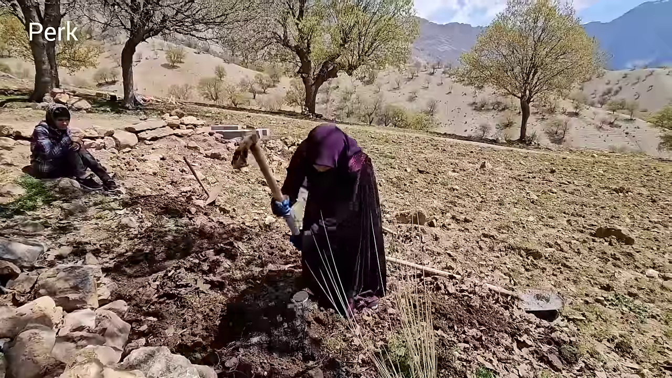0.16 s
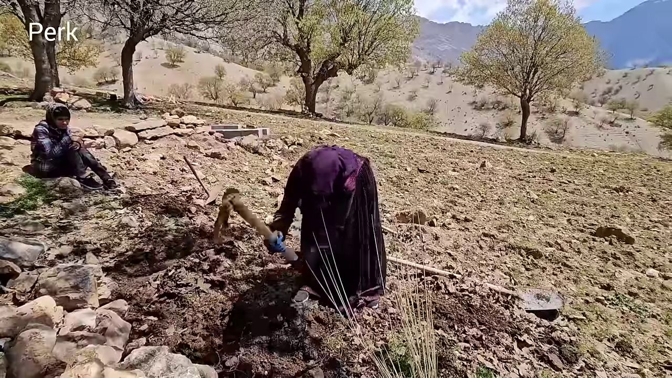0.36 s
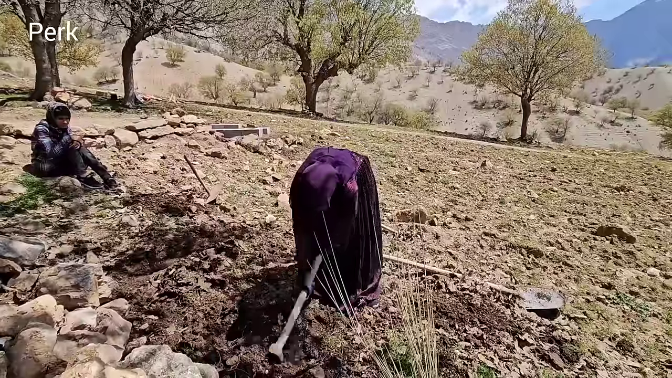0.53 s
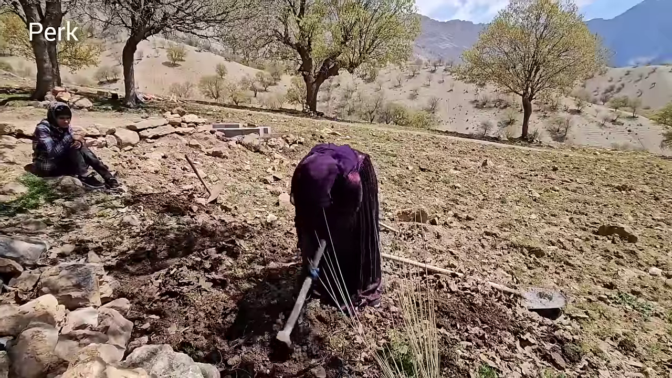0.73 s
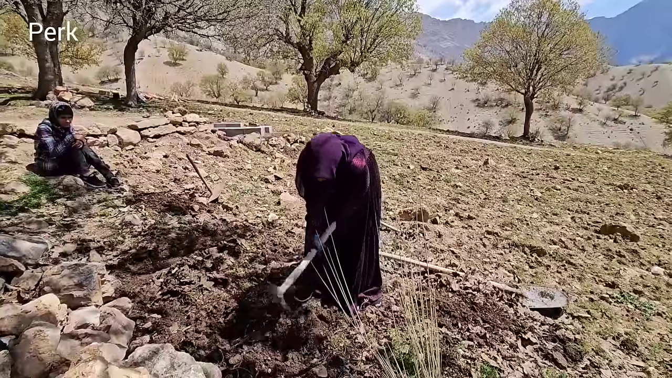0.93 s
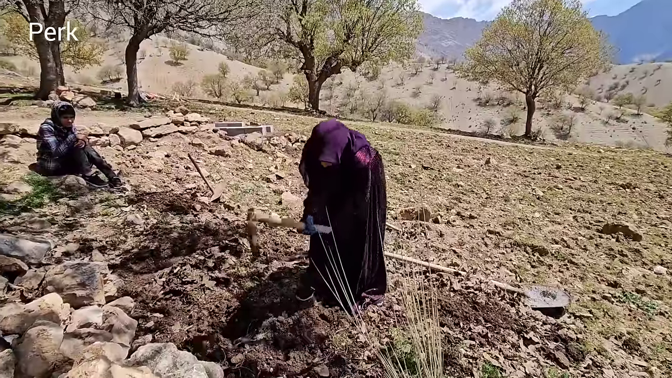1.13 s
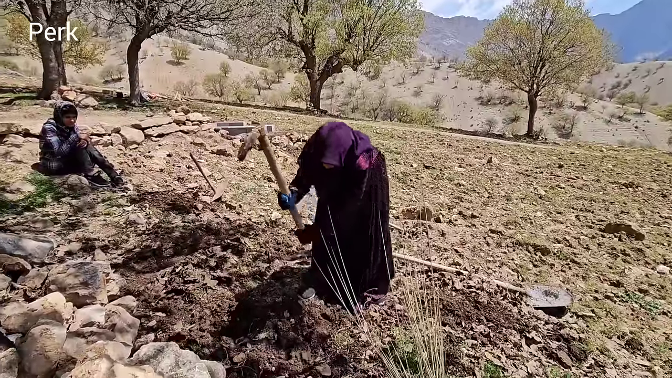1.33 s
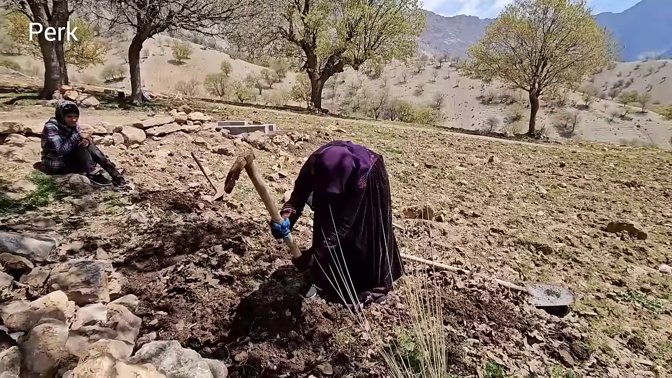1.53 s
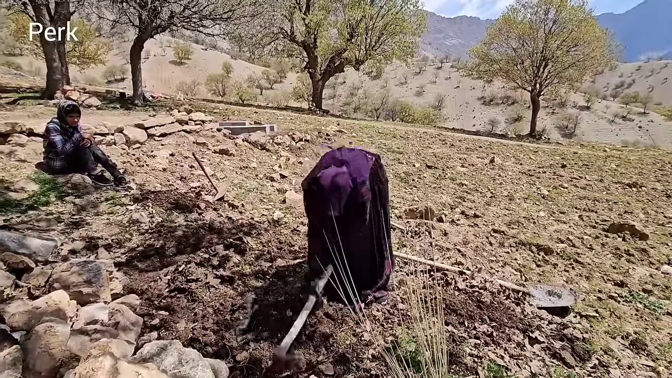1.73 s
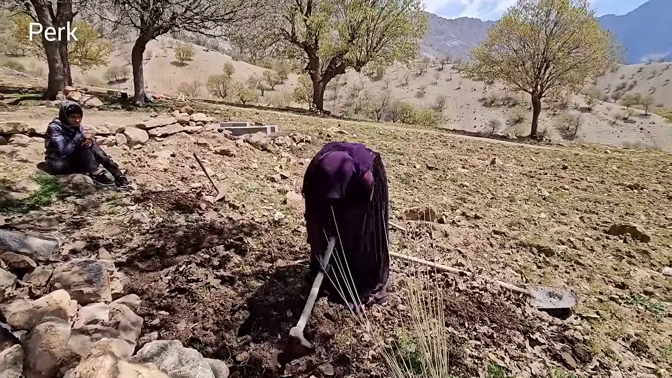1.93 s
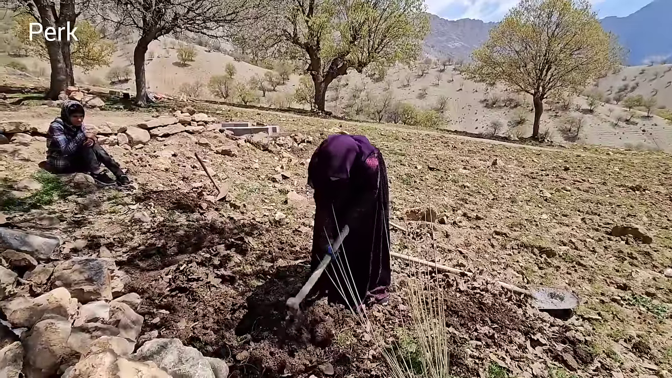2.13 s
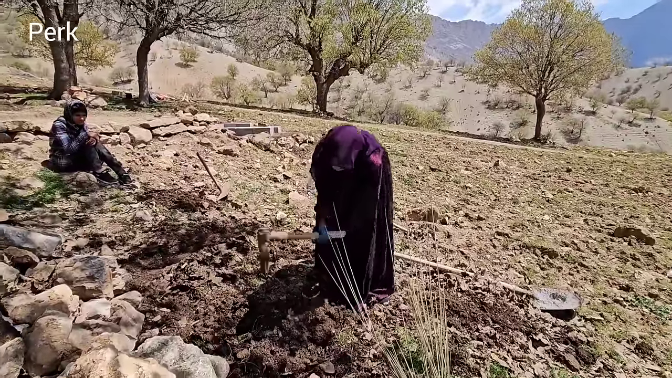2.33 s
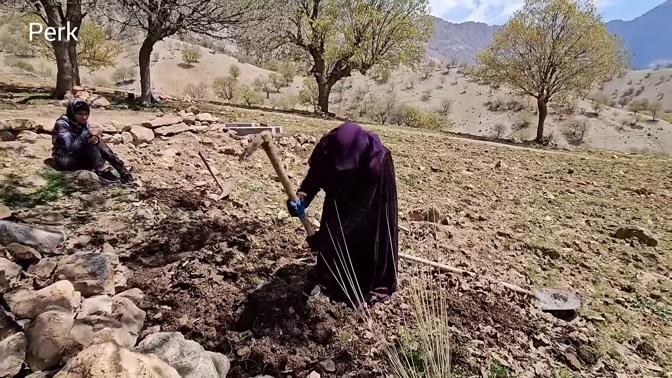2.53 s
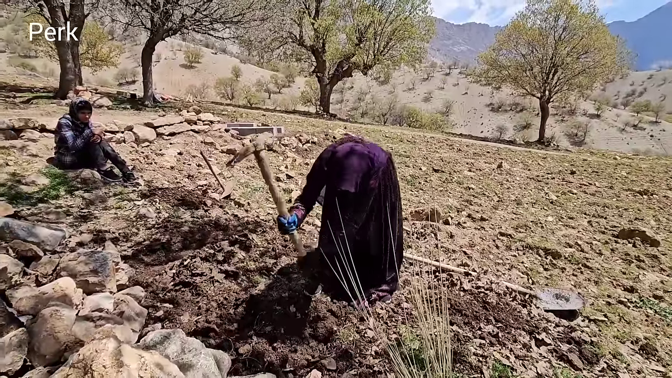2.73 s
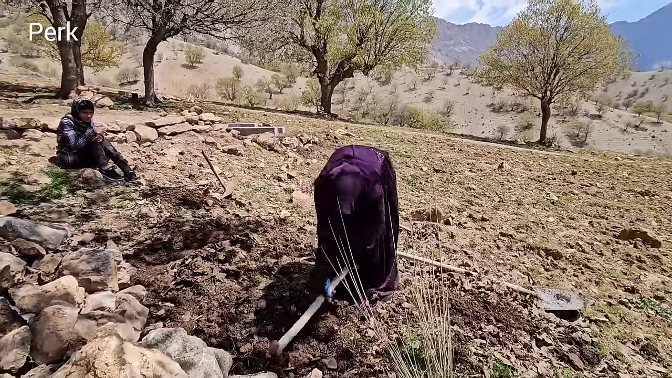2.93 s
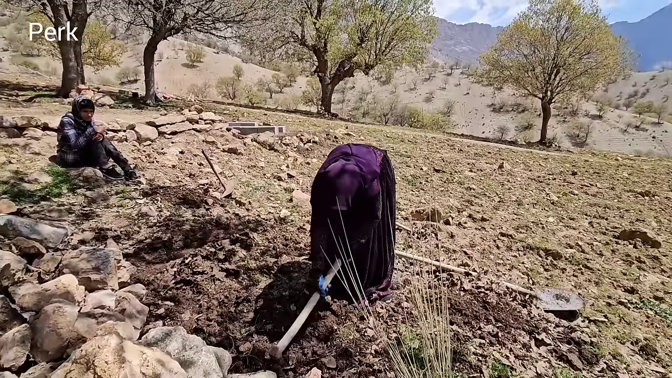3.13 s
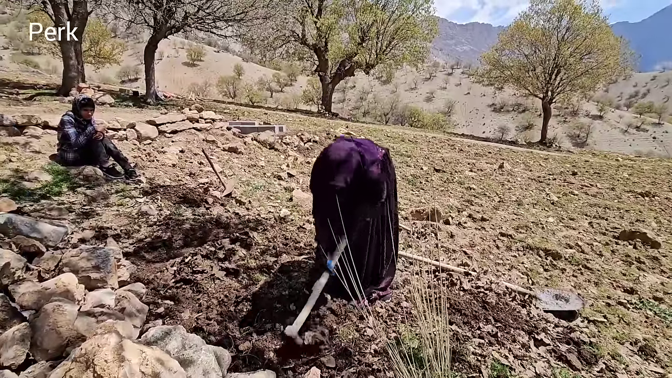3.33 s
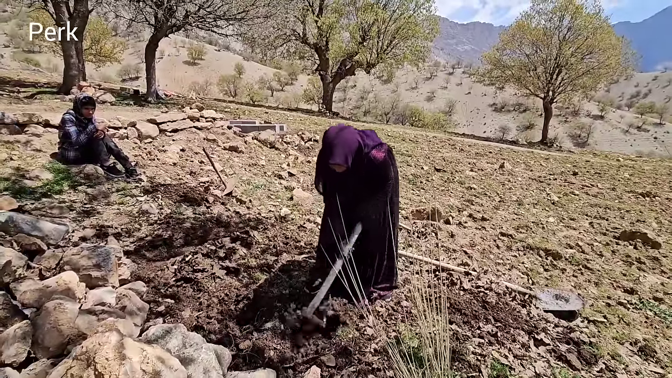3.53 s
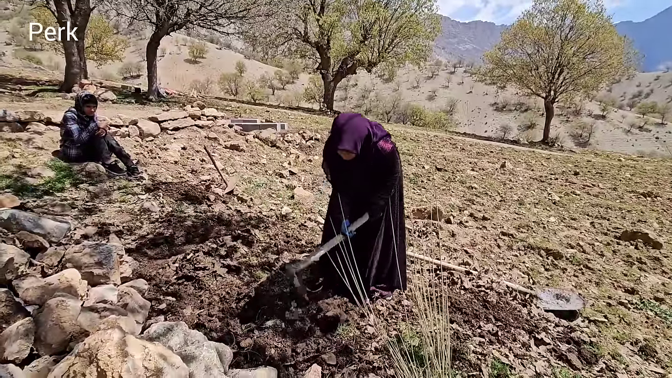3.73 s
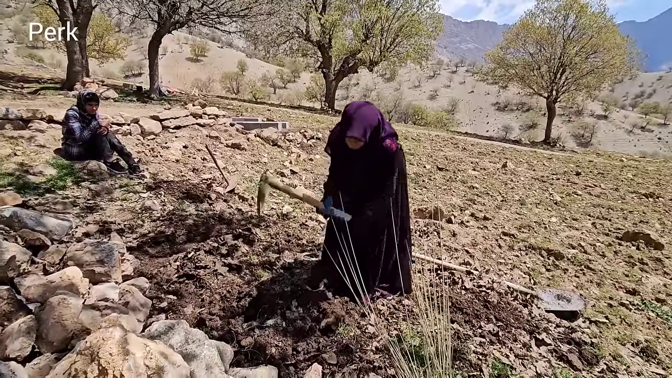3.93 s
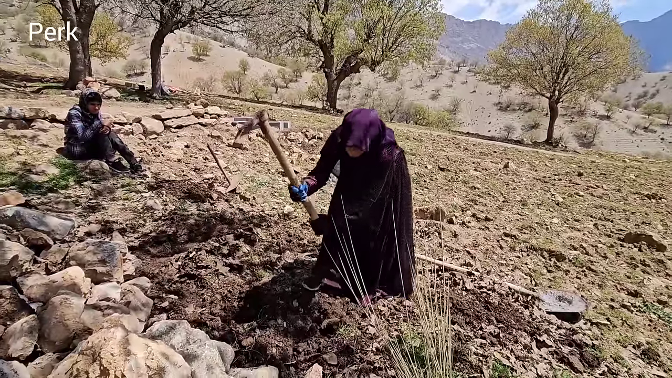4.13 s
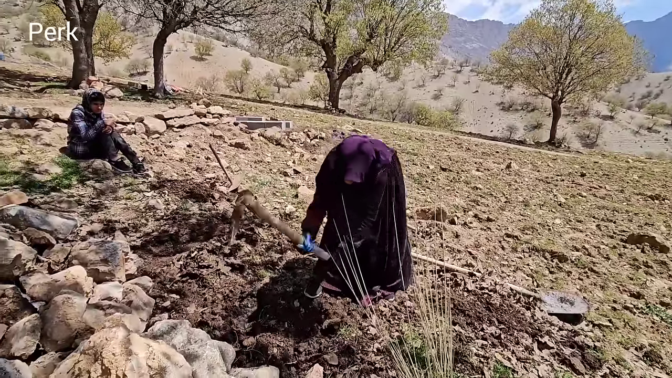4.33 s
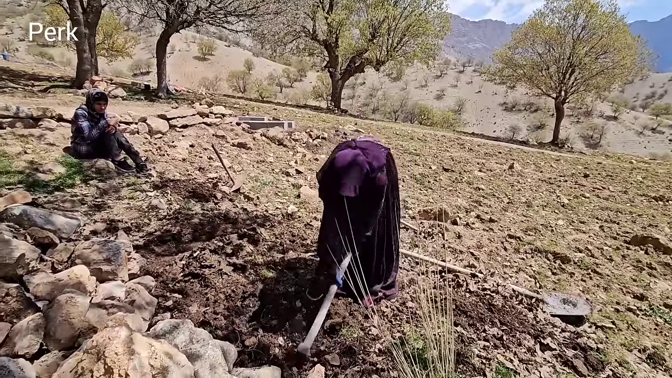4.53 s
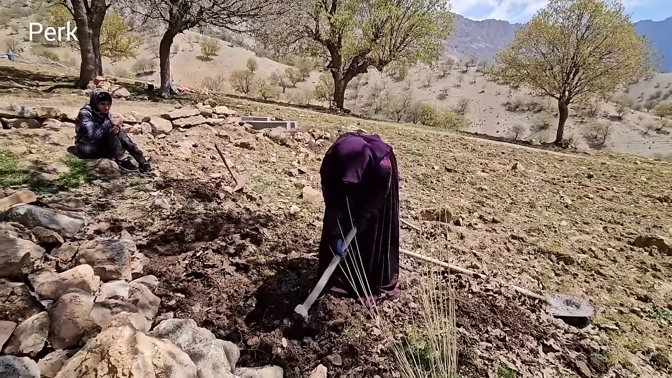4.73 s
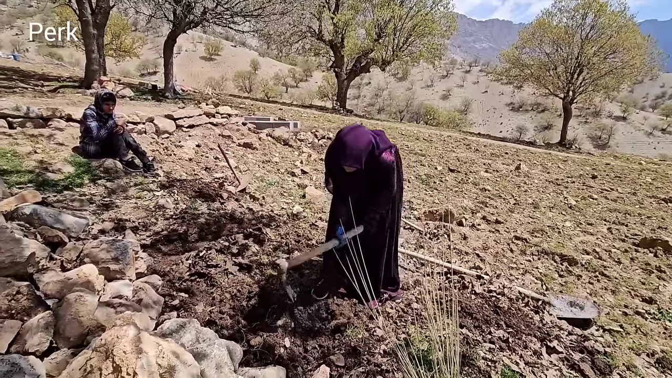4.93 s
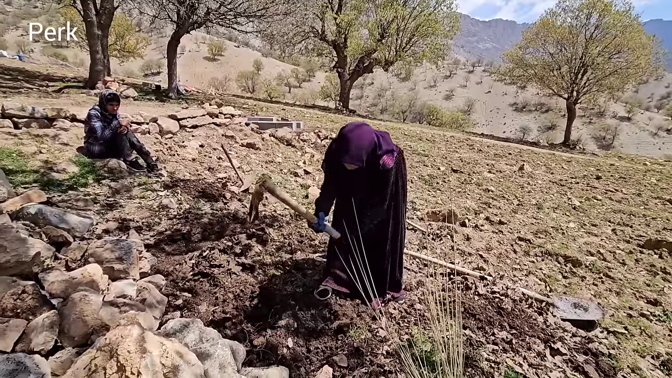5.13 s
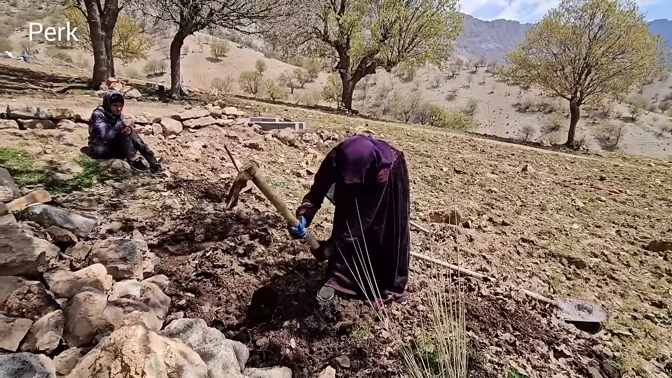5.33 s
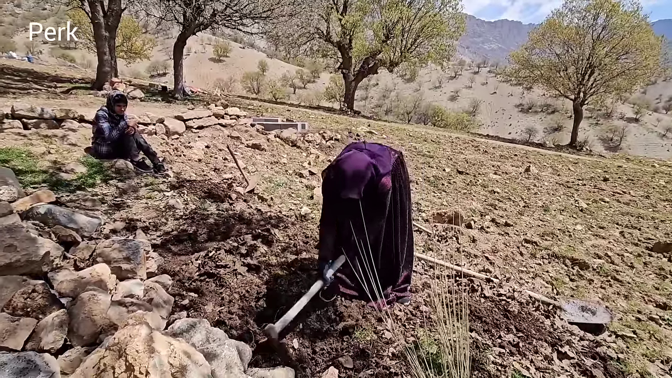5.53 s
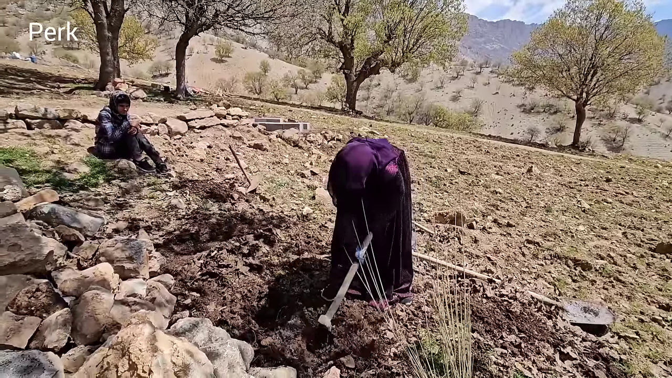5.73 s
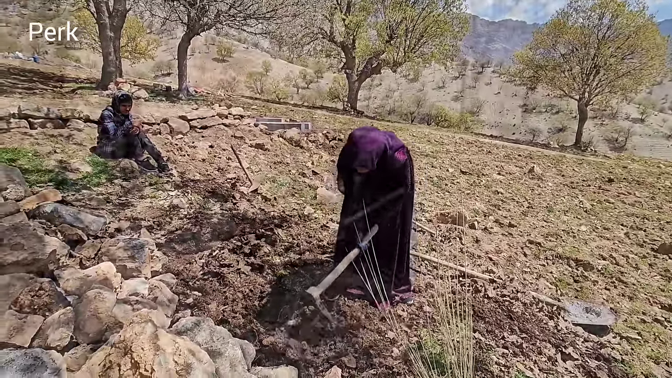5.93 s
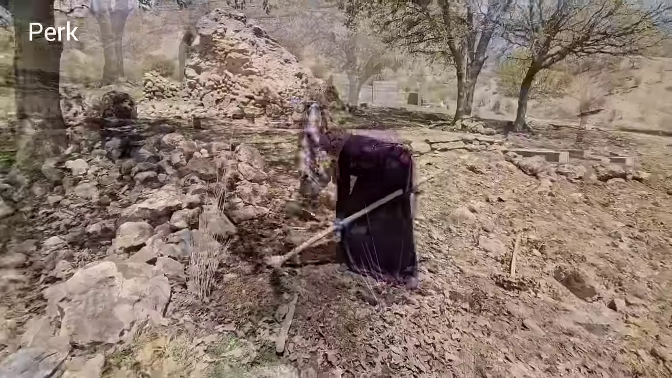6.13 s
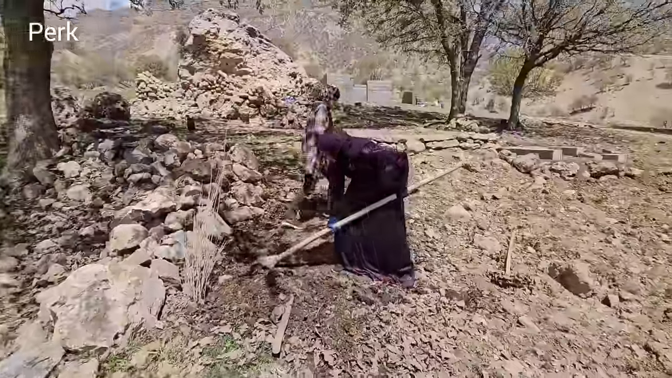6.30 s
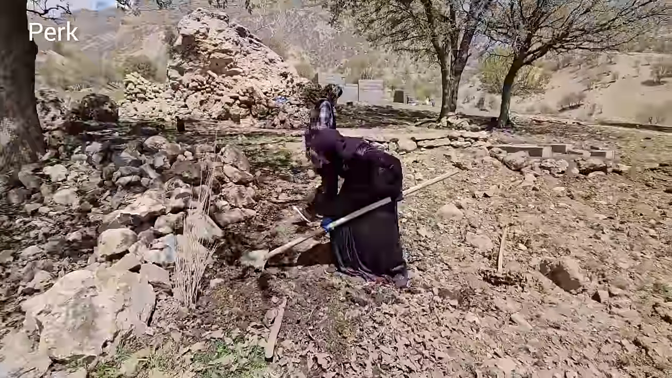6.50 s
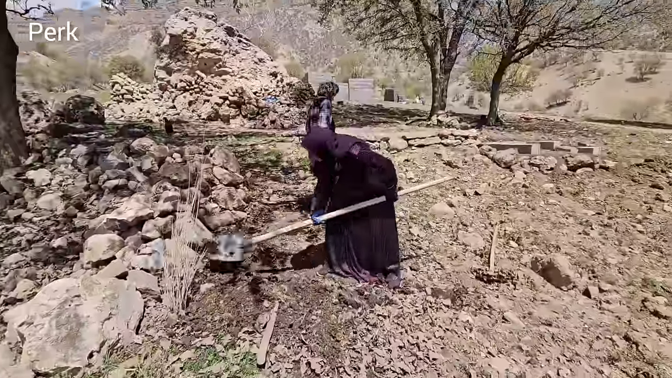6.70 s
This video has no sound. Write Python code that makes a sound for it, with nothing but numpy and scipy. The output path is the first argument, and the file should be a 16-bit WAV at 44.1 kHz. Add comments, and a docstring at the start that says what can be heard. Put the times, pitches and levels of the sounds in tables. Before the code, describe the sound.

A pick digs stony soil close to a stereo microphone pair on a quiet open hillside, with almost no echo. Behind it are soft airy hiss and a faint low drone that swells after the first second and fades near the end. At 0.5 s a light, dull, gritty blow lands; around 0.9 s metal scrapes faintly as the pick drags out. At 1.7 s comes the loudest strike, a sharp crunch with a short rough stone ping, then crumbling earth. A second strong crunch follows at 2.9 s. A clod knocks to the left at 3.7 s. Softer strikes come at 4.45 s, with a clanky edge, and 5.5 s, duller. Loose soil trickles between. Tiny wavering bird whistles appear far off until about 4.4 s, clearest near 2.4 s. From 6.3 to 6.8 s, a soft thump, light shovel scrapes and sliding dirt.

```python
"""A pick is swung five times into stony soil, close to a stereo pair of microphones on an open hillside.
Bursts of tiny fractures ring its steel head, and buried stones answer with short rough pings.
Metal scrapes ring early on as the pick drags out, then near the end as a shovel works the spoil.
Clods knock, soil slumps, and loose earth trickles as random grains.
Small birds whistle far off in pieces of one pitch arch; behind them lie a soft noise hiss and a low drone.
"""
import sys
import numpy as np
from scipy import signal
from scipy.fft import rfft, irfft
from scipy.io import wavfile

SR = 44100
rng = np.random.default_rng(int(sys.argv[2]) if len(sys.argv) > 2 else 0)


def transcribe(u):
    """Save the signal u as a 16-bit wav file named by the first command-line argument.

    u: samples, shape (n,) or (channels, n), limited to [-1, 1]; the rate is SR.
    q: integer samples, one column per channel.
    """
    v = np.clip(np.atleast_2d(u).T, -1, 1)
    q = np.round(v * 32767).astype(np.int16)
    wavfile.write(sys.argv[1], SR, q)


N = 302510


def from_db(db):
    """Decibels to gain."""
    return 10 ** (np.asarray(db) / 20)


def rms_one(x):
    """Scale to unit rms."""
    return x / np.sqrt(np.mean(x ** 2) + 1e-20)


def in_time(rows):
    """Curve columns at every sample."""
    s, *columns = np.transpose(rows)
    return [np.interp(np.arange(N) / SR, s, c) for c in columns]


def at_hz(points, hz):
    """Read a spectrum on a log-frequency axis."""
    point_hz, values = np.transpose(points)
    return np.interp(np.log(hz + 1e-9), np.log(point_hz), values)


def add(out, sound, s):
    """Mix a stereo sound in from time s."""
    at = max(round(s * SR), 0)
    out[:, at:at + sound.shape[1]] += sound[:, :N - at]


def band(x, low_hz, high_hz, order=2):
    """Causal band-pass."""
    edges = [low_hz, min(high_hz, .45 * SR)]
    return signal.sosfilt(signal.butter(order, edges, "band", fs=SR, output="sos"), x)


def resonance(x, hz, width_hz):
    """Two-pole resonance with gain 1 on top."""
    r = np.exp(-np.pi * width_hz / SR)
    feedback = [1, -2 * r * np.cos(2 * np.pi * hz / SR), r * r]
    return signal.lfilter(np.array([1, 0, -1]) * (1 - r * r) / 2, feedback, x)


# how alike the two microphones hear a steady noise: (frequency [Hz], correlation [-1 to 1])
MICROPHONE_LIKENESS = [(60, 1), (130, 0.69), (290, 0.59), (640, 0.48), (1400, 0), (15000, 0.55)]


def coloured(x, spectrum):
    """Give a steady stereo noise a spectrum; its bass is alike in both microphones; rms 1."""
    hz = np.arange(N // 2 + 1) * SR / N
    mid, side = rfft(x) * from_db(at_hz(spectrum, hz))
    alike = np.clip(at_hz(MICROPHONE_LIKENESS, hz), -1, 1)
    shared, opposed = np.sqrt(1 + alike) * mid, np.sqrt(1 - alike) * side
    return rms_one(irfft(shared + opposed * [[1], [-1]], N))


def grains(length, per_s, spread_db):
    """Random tiny fractures: many weak, a few strong."""
    sizes = from_db(spread_db * np.minimum(rng.exponential(1, length), 4)) * rng.standard_normal(length)
    return rms_one(sizes * (rng.random(length) < per_s / SR))


LEFT_LEAD_S = .00026


def placed(x, pan_db, lead=1):
    """Sound from a little to the left reaches that microphone first; positive pan is louder on the left."""
    n = np.arange(len(x))
    delayed = np.interp(n - round(lead * LEFT_LEAD_S * SR), n, x)
    gains = rms_one(from_db(np.array([[.5], [-.5]]) * pan_db))
    return np.array([x, delayed]) * gains


KNOCK_T = np.arange(-1384, 15000) / SR   # seconds around the peak of the contact
ATTACK = (KNOCK_T > -.001) & (KNOCK_T < .012)   # levels of a knock hold over this stretch


def swell(rise_s, t60):
    """Contact builds up, peaks at time zero and dies away."""
    build_up = np.exp(np.minimum(KNOCK_T, 0) / max(rise_s, 1e-4))
    return build_up * from_db(-60 * np.maximum(KNOCK_T, 0) / t60)


# bands of thud, crunch, clank, grit: (low edge [Hz], high edge [Hz])
PART_BANDS = [(45, 390), (400, 2400), (2500, 4500), (4800, 16500)]
# decay time of each part relative to the knock's t60 [ratio]: the ground shakes longest
PART_LASTS = [2.6, 1.0, 0.85, 1.1]
# share of the left lead in each part [0-1]: the ground's thud reaches both microphones together
PART_LEADS = [0, 1, 1, 1]
# colour of breaking soil: (frequency [Hz], relative level [dB])
SOIL_COLOUR = [(30, 3), (4400, -0.5), (5100, -0.5), (6100, 4.5), (7400, -3), (8300, -9), (9200, -6.5),
               (10200, -13.5), (11500, -4), (16000, -5)]


def knock(row, modes, plain_db, crack_db, push_db, crumble_db, crumble_t60, entry_db):
    """A push and a dense burst of soil fractures set the body ringing, then crumbs settle."""
    s, *levels_db, rise_s, t60, pan_db = row
    crack = from_db(crack_db) * swell(rise_s, .3 * t60)
    entry = from_db(entry_db) * swell(.005, t60)   # loose topsoil gives way first
    crumble = from_db(crumble_db) * swell(rise_s, crumble_t60)
    contact = np.exp(-(KNOCK_T / rise_s) ** 2)   # the momentum arrives as one pulse: softer is duller
    push = from_db(push_db) * contact / contact.sum()
    length = len(KNOCK_T)
    soil = from_db(at_hz(SOIL_COLOUR, np.arange(length // 2 + 1) * SR / length))
    out = 0
    for level_db, (low_hz, high_hz), lasts, lead in zip(levels_db, PART_BANDS, PART_LASTS, PART_LEADS):
        fractures = irfft(rfft(grains(length, 25000, 2.4)) * soil, length)
        burst = push + fractures * (entry + crack + swell(rise_s, t60 * lasts) + crumble)
        ringing = sum(from_db(db) * resonance(burst, hz, width_hz) for hz, width_hz, db in modes)
        part = band(from_db(plain_db) * burst + ringing, low_hz, high_hz, order=3)
        part *= from_db(level_db) / np.sqrt(np.mean(part[ATTACK] ** 2))
        out = out + placed(part, pan_db, lead)
    return out


# contacts of the pick, some blows having two or three; levels are relative: (time [s], thud [dB],
# crunch [dB], clank [dB], grit [dB], rise [s], base t60 [s], pan [dB], stone pitch [Hz], stone ring [dB])
PICK_BLOWS = [(0.5135, -42.5, -41.5, -45.5, -42, 0.0024, 0.019, 2, 3135, -40.5),
              (1.717, -20.5, -21, -22, -25, 0.0006, 0.035, 0.5, 2950, -22),
              (1.8089, -43.5, -37.5, -51, -56, 0.00085, 0.04, 1, 2940, -45.5),
              (1.826, -55, -45.5, -50, -58, 0.00092, 0.011, -1, 3430, -44.5),
              (2.9324, -30.5, -23, -27.5, -30.5, 0.00065, 0.038, 2, 2900, -36),
              (4.4521, -50.5, -46, -46.5, -37.5, 0.0014, 0.033, 1.5, 3149, -32.5),
              (4.468, -46.5, -38, -34, -42.5, 0.00091, 0.034, 2, 3265, -33.5),
              (5.529, -57, -57, -59, -59, 0.0017, 0.062, 1.5, 3000, -58.5),
              (5.546, -50.5, -39.5, -48.5, -45.5, 0.0033, 0.077, 1.5, 3276, -44)]
# resonances of the steel head: (frequency [Hz], width [Hz], level [dB])
PICK_HEAD = [(109, 24, 12), (203, 32, 5), (252, 39, 7), (301, 40, 2), (546, 90, -8.5), (803, 140, 0.5),
             (1040, 200, 0), (1302, 87, 8), (1988, 160, 13), (2940, 110, 4), (3716, 70, 6), (4320, 70, -1),
             (4650, 60, -3), (5460, 430, 1), (6180, 180, 3), (6780, 110, -1.5)]


def pick(stone_t60=.028, stone_rough=0.5):
    """Each blow crunches into the soil, and the stone it meets gives a short, rough ping."""
    out = np.zeros((2, N))
    for *blow, stone_hz, stone_db in PICK_BLOWS:
        s, rise_s, pan_db = blow[0], blow[-3], blow[-1]
        chatter = rms_one(band(rng.standard_normal(len(KNOCK_T)), 49, 270))
        phase = 2 * np.pi * stone_hz * KNOCK_T + stone_rough * chatter
        ping = np.sin(phase) * swell(rise_s, stone_t60)
        ping *= from_db(stone_db) / np.sqrt(np.mean(ping[ATTACK] ** 2))
        crunch = knock(blow, PICK_HEAD, plain_db=-7.0, crack_db=-1, push_db=30.0,
                       crumble_db=-16.5, crumble_t60=0.12, entry_db=-21)
        add(out, crunch + placed(ping, pan_db), s + KNOCK_T[0])
    return from_db(2.5) * out


# ringing scrapes of metal on stones, two early as the pick drags out, the rest near the end; levels are
# relative: (time [s], thud [dB], crunch [dB], clank [dB], grit [dB], rise [s], base t60 [s], pan [dB])
TOOL_SCRAPES = [(0.908, -62.5, -60, -60, -55.5, 0.00084, 0.49, 2),
                (0.931, -86, -51, -47.5, -49, 0.0013, 0.052, -6.5),
                (6.451, -67, -64, -79.5, -65, 0.0021, 0.026, -2),
                (6.474, -64, -47.5, -56, -56, 0.0014, 0.16, -1),
                (6.508, -66, -41.5, -53.5, -53.5, 0.0048, 0.058, 1),
                (6.518, -83, -48.5, -45.5, -56, 0.0038, 0.061, -4.5),
                (6.619, -94.5, -59, -64.5, -69, 0.0014, 0.045, -7.5),
                (6.661, -82, -59, -54, -81, 0.0021, 0.044, -10),
                (6.704, -79.5, -76.5, -66, -70, 0.00088, 0.049, -5)]
# resonances of the scraping metal: (frequency [Hz], width [Hz], level [dB])
SCRAPING_METAL = [(257, 126, 3.5), (774, 42, 8), (1239, 39, 18.5), (2140, 250, 8.5), (2576, 37, -16),
                  (3260, 35, -8), (5950, 660, 9.5)]


def scrapes():
    """Metal rings as it grates over stones."""
    out = np.zeros((2, N))
    for row in TOOL_SCRAPES:
        scrape = knock(row, SCRAPING_METAL, plain_db=-6.0, crack_db=27, push_db=20,
                       crumble_db=12, crumble_t60=0.22, entry_db=-6)
        add(out, scrape, row[0] + KNOCK_T[0])
    return from_db(1.2) * out


SOFT_T60_S, SOFT_T60_PER_CONTACT = .017, 9   # a softer lump takes longer to fall apart
SOFT_GRIT_DB = -9.5   # grit, relative to the tick
# clods and pebbles landing, soft slumps of soil around the blows, and a faint puff at 3.38 s; levels are #
# relative: (time [s], thud [dB], crunch [dB], tick [dB], contact time [s], pan [dB])
SMALL_GROUND_SOUNDS = [(0.133, -77, -66.5, -64.5, 0.00057, -12), (0.548, -57, -92, -61, 0.0038, 4),
                       (1.794, -43, -40, -44, 0.0034, 0.5), (3.38, -60.5, -59, -54, 0.00055, 0),
                       (3.7128, -46.5, -36, -53.5, 0.00049, -17.5), (3.761, -51.5, -56, -68.5, 0.0015, -22),
                       (4.191, -74.5, -73, -62.5, 0.00042, -1), (4.496, -49, -75, -52, 0.0017, 2),
                       (4.667, -69, -76, -66.5, .002, -1), (4.708, -71, -70, -65.5, 0.0014, -2),
                       (5.149, -79.5, -60.5, -67.5, 0.0009, -8), (5.352, -55.5, -84, -95, 0.0016, -19),
                       (5.593, -48, -58, -62, 0.0013, 0), (5.619, -69.5, -60, -61, 0.0028, 5),
                       (6.279, -49.5, -54.5, -82, 0.0002, 0.5), (6.716, -68, -70, -59.5, 0.00037, -3),
                       (6.832, -72, -62, -54.5, 0.00024, -1.5)]
# resonances of the earth: (frequency [Hz], width [Hz], level [dB])
EARTH = [(80.3, 21, 5), (145, 14, 13.5), (245, 80, 4), (790, 400, 7), (1270, 1300, 7), (3430, 1300, -3.5)]


def small_ground_sounds():
    """Short pushes and fractures, damped by the earth: dead knocks, soft slumps and a faint puff."""
    out = np.zeros((2, N))
    for s, thud_db, crunch_db, tick_db, contact_s, pan_db in SMALL_GROUND_SOUNDS:
        t60 = SOFT_T60_S + SOFT_T60_PER_CONTACT * contact_s
        row = (s, thud_db, crunch_db, tick_db, tick_db + SOFT_GRIT_DB, contact_s, t60, pan_db)
        sound = knock(row, EARTH, plain_db=-4, crack_db=-4.5, push_db=34.0,
                      crumble_db=-21.0, crumble_t60=.12, entry_db=-15.0)
        add(out, sound, s + KNOCK_T[0])
    return from_db(-2.0) * out


SPILL_ATTACK_S, SPILL_T60_S = 0.039, .33   # a slide gathers pace and runs out slowly


def slide(start_s, length_s, t60):
    """Flow of one slide of earth: attack, hold, release."""
    t = np.arange(N) / SR - start_s
    return np.clip(1 + t / SPILL_ATTACK_S, 0, 1) * from_db(-60 * np.maximum(t - length_s, 0) / t60)


# a hard blow throws soil up, and it rains back while the head sinks in
THROWN_SAND_DB, THROWN_CRUMBS_DB = -33.5, -31.5   # relative to the blow's crunch
THROWN_S, THROWN_T60_S = 0.016, 0.1
# after each blow the rim of the hole keeps crumbling; relative levels
SETTLE_SAND_DB, SETTLE_CRUMBS_DB, SETTLE_T60_S = -78, -81, 2.1
SETTLE_FOLLOWS = .1   # dB of settling per dB of the blow's crunch
# loose earth sliding off the tool or down the heap; levels are relative: (start [s], length [s],
# fine sand [dB], coarse crumbs [dB])
EARTH_SPILLS = [(0.808, 0.022, -67, -69.5), (1.603, 0.22, -74, -78.5), (1.975, .11, -75.5, -82),
                (3.677, .05, -76.5, -66.5), (4.114, 0.069, -73.5, -79), (4.653, .14, -74, -79),
                (5.741, .12, -68, -67), (6.152, .12, -74.5, -70), (6.268, 0.064, -72.5, -62.5),
                (6.66, 0.25, -69, -68)]


def earth_flow():
    """Strength of sand and crumbs: the spills, and the soil thrown up by each blow and settling after it."""
    flow = np.zeros((2, N))
    for s, length_s, sand_db, crumb_db in EARTH_SPILLS:
        flow = np.maximum(flow, from_db([[sand_db], [crumb_db]]) * slide(s, length_s, SPILL_T60_S))
    times, _, crunch_db = np.transpose(PICK_BLOWS)[:3]
    thrown_gain = from_db([[THROWN_SAND_DB], [THROWN_CRUMBS_DB]])
    settle_gain = from_db([[SETTLE_SAND_DB], [SETTLE_CRUMBS_DB]])
    for s, db in zip(times, crunch_db):
        thrown = thrown_gain * from_db(db) * slide(s + SPILL_ATTACK_S, THROWN_S, THROWN_T60_S)
        settling = from_db(SETTLE_FOLLOWS * (db - crunch_db.mean())) * slide(s, 0, SETTLE_T60_S)
        flow = np.maximum(flow, thrown + settle_gain * settling)
    return flow


PEBBLES_PER_S, PEBBLE_SPREAD_DB = 90, 3   # lone bits of gravel among the sand
# colour of fine sand: (frequency [Hz], relative density [dB per Hz])
SAND_COLOUR = [(1500, -13), (2500, -5), (3400, 0.5), (4500, -0.5), (5900, -4), (7400, -0.5), (8600, -14),
               (9800, -22), (11500, -11), (16000, -11)]
# colour of coarse crumbs: (frequency [Hz], relative density [dB per Hz])
CRUMB_COLOUR = [(150, -13), (300, -1), (600, -4.5), (1000, -1), (1350, -3.5), (1750, -6.5), (2500, -6.5),
                (4000, -21), (6000, -49)]


def trickle(sand_db=2.5, crumb_db=-0.5, clump_db=2.0, crumb_ring_db=5):
    """Sand, gravel and crumbs patter in uneven clumps; all crumbs share a ringing tone near 1330 Hz."""
    sand_flow, crumb_flow = earth_flow()
    clumps = clump_db * rms_one(band(rng.standard_normal(N), 5.5, 70))
    fine = np.array([grains(N, 9800, 2.8) for ear in range(2)])
    gravel = np.array([grains(N, PEBBLES_PER_S, PEBBLE_SPREAD_DB) for ear in range(2)])
    sand = coloured(fine + .5 * gravel, SAND_COLOUR)
    crumbs = coloured(np.array([grains(N, 1800, 3.8) for ear in range(2)]), CRUMB_COLOUR)
    crumbs = rms_one(crumbs + from_db(crumb_ring_db) * resonance(crumbs, 1330, 200))
    falling = from_db(sand_db) * sand_flow * sand + from_db(crumb_db) * crumb_flow * crumbs
    return from_db(clumps) * falling


# every note is a piece of one arch: this far down, this long from its top
ARCH_DROP_HZ, ARCH_HALF_S = 1008, 0.042
# far bird notes: (time [s], length [s], top of the arch [Hz], where the top falls in the note [0-1],
# peak level [dB])
BIRD_NOTES = [(0.275, 0.047, 3940, 0, -63), (0.335, 0.067, 3960, 0.82, -68.5),
              (0.633, .055, 3940, 0.4, -64.5), (0.71, 0.057, 3900, 0.04, -64),
              (1.125, 0.085, 4350, 0.36, -58.5), (2.246, 0.071, 4380, 0.19, -63.5),
              (2.406, .085, 4950, 0.28, -55), (2.568, 0.055, 3436, 0.12, -67.5),
              (3.396, 0.051, 4045, 0.9, -60.5), (3.462, 0.055, 3950, .1, -68.5),
              (3.775, .04, 3110, .3, -70), (3.81, 0.033, 4150, .75, -66.5), (3.917, 0.076, 4200, 0.62, -63),
              (4.27, 0.054, 4040, 0.83, -68), (4.326, 0.049, 3450, .1, -72)]


def birds(waver_hz=60):
    """Thin wavering whistles, each a piece of an arch that rises to its top and slides down from it."""
    out = np.zeros((2, N))
    for s, length_s, top_hz, top_share, db in BIRD_NOTES:
        u = np.linspace(0, 1, int(length_s * SR))
        waver = rms_one(band(rng.standard_normal(SR // 4), 23, 250))[:len(u)]
        from_top = (u - top_share) * length_s / ARCH_HALF_S
        hz = top_hz - ARCH_DROP_HZ * from_top ** 2 + waver_hz * waver
        whistle = np.sin(np.pi * u) * np.sin(2 * np.pi * np.cumsum(hz) / SR)
        add(out, placed(from_db(db) * whistle, 0), s)
    return out


def scatter(x, t60, delay_s, low_hz, high_hz):
    """Rough ground, rocks and trees return a short diffuse tail, different in each microphone."""
    t = np.arange(SR // 2) / SR
    noise = band(rng.standard_normal((2, len(t))), low_hz, high_hz)
    echo = noise * from_db(-60 * t / t60) * (t > delay_s)
    return signal.fftconvolve(x, rms_one(echo) / np.sqrt(len(t)), axes=1)[:, :N]


AIR_DB = -72.45   # rms level of the hiss
# colour of the open-air hiss: (frequency [Hz], relative density [dB per Hz])
AIR_COLOUR = [(100, -19.5), (200, -2.5), (300, -5.5), (500, -10.5), (780, -6.5), (1100, -12.5),
              (2000, -11.5), (2800, -15), (3700, -8.5), (4500, -11.5), (5500, -18), (7400, -20),
              (9000, -37.5), (16000, -36)]
# colour of the far drone: (frequency [Hz], relative density [dB per Hz])
DRONE_COLOUR = [(20, -8.5), (40, -7.5), (62, -3), (88, 4), (102, 1), (122, -8.5), (150, -14), (186, -10),
                (215, -17), (300, -22.5), (600, -61)]
# course of the far drone: (time [s], relative level [dB])
DRONE_LEVEL = [(0, -75.5), (.4, -71), (1.2, -67.5), (4.0, -67.5), (5.8, -70), (6.2, -74.5), (6.86, -80.5)]


def background(drone_db=0.63):
    """Soft steady hiss of open country over a far low drone that swells and fades; both are coloured noise."""
    course_db, = in_time(DRONE_LEVEL)
    air = from_db(AIR_DB) * coloured(rng.standard_normal((2, N)), AIR_COLOUR)
    drone = from_db(course_db + drone_db) * coloured(rng.standard_normal((2, N)), DRONE_COLOUR)
    return air + drone


def scene():
    """Digging close by, birds far off, the hillside around them."""
    digging = pick() + scrapes() + small_ground_sounds()
    near_ground = from_db(-17.5) * scatter(digging, 0.084, 0.0087, 500, 9200)
    far_slope = from_db(-42) * scatter(digging, .38, .03, 500, 6000)
    song = birds()
    song_tail = from_db(-10.5) * scatter(song, .18, 0.011, 1700, 5200)
    return digging + near_ground + far_slope + trickle() + song + song_tail + background()


CUTOFF_HZ = 16000


def record(dry):
    """Peaks are clipped at full scale, then a steep low-pass cuts the top."""
    low_pass = signal.ellip(10, .1, 80, CUTOFF_HZ, fs=SR, output="sos")
    return signal.sosfilt(low_pass, np.clip(dry, -1, 1))


dry = scene()
out = record(dry)
transcribe(out)
```